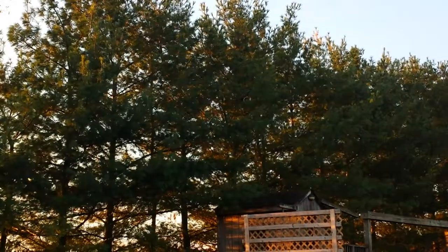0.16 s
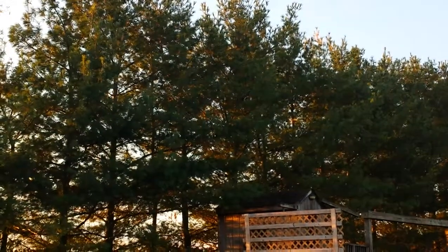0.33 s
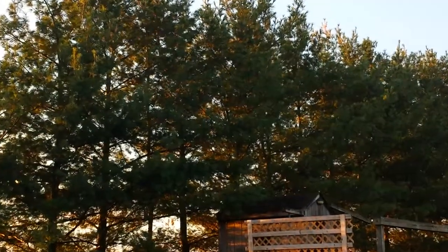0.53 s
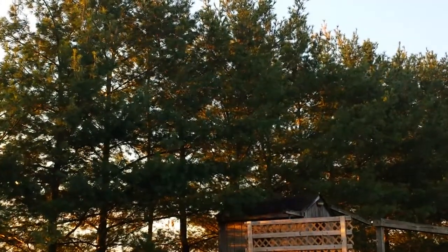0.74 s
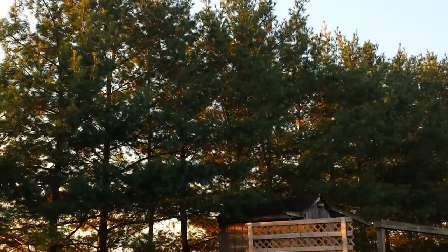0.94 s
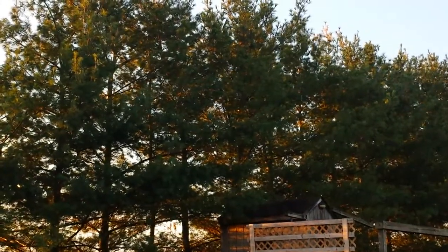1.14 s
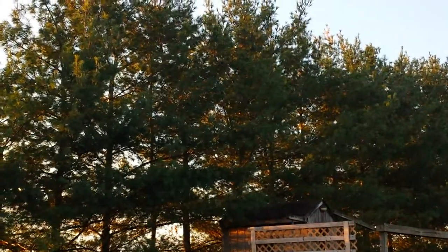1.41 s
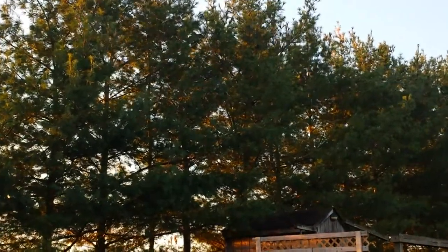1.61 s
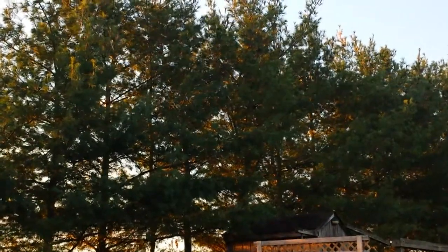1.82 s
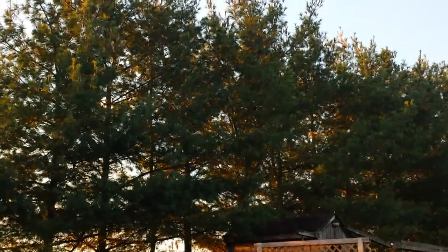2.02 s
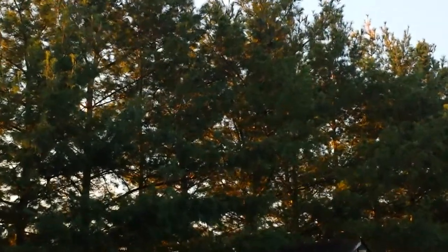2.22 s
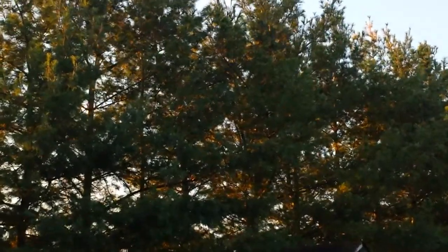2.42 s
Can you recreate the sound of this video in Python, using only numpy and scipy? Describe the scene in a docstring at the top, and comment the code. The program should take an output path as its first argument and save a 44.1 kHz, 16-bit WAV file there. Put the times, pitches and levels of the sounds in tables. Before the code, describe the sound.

Gusty wind rumbles and flutters on a microphone, mostly left, with four plastic clicks and sighing pines

```python
"""A stand of tall pines, some way off: wind sighs in the needles, as shaped noise, over faint wavering sines.
A small camera with two microphone ports hears it. Gusts tumble across the ports as soft thumps, mostly on
the left: short pressure swings of falling pitch. The plastic body ticks four times near the right port,
each a snap and rebound ringing the shell's resonances. A limiter ducks everything around the loudest peaks."""
import sys
import numpy as np
from scipy import signal
from scipy.fft import rfft, irfft
from scipy.io import wavfile
from scipy.ndimage import uniform_filter1d, minimum_filter1d

SR = 44100
rng = np.random.default_rng(int(sys.argv[2]) if len(sys.argv) > 2 else 0)


def log_audio(samples):
    """Write samples as a 16-bit WAV file to the path given in sys.argv[1]."""
    # one column per channel
    frames = np.atleast_2d(samples).T
    # limit to full scale, then quantise
    limited = np.clip(frames, -1, 1)
    pcm = np.round(limited * 32767).astype(np.int16)
    wavfile.write(sys.argv[1], SR, pcm)


N = 112896
TIME = np.arange(N) / SR
HZ = np.fft.rfftfreq(N, 1 / SR)

# Mean spectrum of the needles' sough and the microphone hiss at the two ports:
# f/Hz, left density level/dB per Hz, right density level/dB per Hz, shared power fraction/1
SOUGH_SPECTRUM = [(40, -59, -57, 0.34), (85, -58, -57, 0.2), (170, -67, -66.5, 0.85),
                  (260, -69.5, -68.5, 0.93), (325, -64.5, -65, 0.94), (482, -70, -69.5, 0.97),
                  (690, -61.5, -65, 0.87), (770, -61, -59.5, 0.75), (1017, -66, -65.0, 0.7),
                  (1340, -67.0, -66.0, 0.81), (1800, -71.5, -69.5, 0.79), (2080, -75, -75, 0.61),
                  (2646, -82.5, -87.5, 0.19), (3460, -88.5, -89.5, 0.0), (4260, -88.5, -90.5, 0.0),
                  (5420, -86.5, -88.5, 0.08), (6400, -79.5, -89.5, 0.14), (6940, -84, -89, 0.0),
                  (8170, -93.5, -91.5, 0.0), (10500, -98, -96, 0.0), (12600, -99.3, -99.7, 0.25),
                  (15200, -100.1, -99.7, 0.5)]
# Slow swell of the sough: t/s, level/dB
SOUGH_SWELL = [(0, 0), (.3, -0.5), (.6, 0), (.9, 0), (1.2, 0), (1.5, -0.5), (1.8, 0), (2.1, -0.5),
               (2.56, 0)]
SOUGH_RIGHT_DELAY_S, NOISE_TOP_CUT_HZ = 0.00041, 15450
FLICKER_DB, FLICKER_PER_S = 0.81, 14
SIGH_DB, SIGH_PER_S, SIGH_TOP_HZ = 1.01, 6.13, 2500  # bands above this only flicker

# Faint distant tones: mean f/Hz, left rms level/dB, right rms level/dB, pitch waver/Hz
HUM_TONES = [(111.3, -43, -43, 2.7), (648, -52, -54.5, 7.8), (819, -56, -52, 7)]
HUM_WAVER_DB, HUM_WAVER_PER_S, HUM_PITCH_PER_S = 3.5, 11, 8

# Large eddies striking a port:
# t/s, envelope peak level/dB, f at the peak/Hz, width at half height/ms, port (0 left, 1 right)
LARGE_EDDIES = [(0.04, -20.5, 143, 10.2, 1), (0.404, -20.5, 103, 35, 1), (0.425, -14.5, 134, 7.3, 1),
                (0.827, -18.5, 117, 13, 0), (1.223, -13.5, 127, 6.8, 0), (1.262, -8, 126, 9.6, 0),
                (1.276, -7, 130, 5.1, 0), (1.296, -10, 137, 4.4, 0), (1.432, -9, 177, 6.8, 0),
                (1.454, -7, 146, 8.3, 0), (1.482, -10, 148, 20, 0), (1.499, -23, 87, 31, 0),
                (1.513, -3, 136, 5.4, 0), (1.532, -4, 192, 3.3, 0), (1.547, -19, 131, 14, 0),
                (1.575, -15, 123, 9.5, 1), (1.612, -19.1, 135, 20, 0), (1.64, -12.5, 157, 8.1, 0),
                (1.663, -26, 94, 7.1, 0), (1.663, -23, 112, 20, 1), (1.679, -8.5, 129, 8.8, 0),
                (1.693, -12, 109, 7.7, 0), (1.709, -16, 98, 12, 0), (1.731, -13, 129, 18, 0),
                (1.749, -13, 172, 7.6, 0), (1.787, -10, 147, 11.5, 0), (1.823, -12.1, 105, 13, 0),
                (1.867, -5.5, 160, 5, 0), (1.917, -15, 138, 10, 0), (2.104, -22, 113, 28, 0),
                (2.229, -6, 168, 5.4, 0), (2.246, -18, 119, 11.3, 0), (2.268, -14, 206, 10.1, 0),
                (2.287, -22.2, 141, 9.2, 1), (2.3, -21, 152, 29, 0), (2.32, -10, 193, 6.1, 1),
                (2.337, -18.1, 177, 11, 1), (2.338, -17, 129, 8.5, 0), (2.352, -15.5, 109, 6.7, 0),
                (2.368, -15.5, 206, 11.5, 0), (2.38, -21, 163, 9.7, 1), (2.397, -20.5, 134, 12, 1),
                (2.414, -12.5, 145, 7, 0), (2.429, -9.5, 228, 7.3, 0), (2.443, -12, 129, 10.4, 0),
                (2.443, -26, 104, 10, 1), (2.457, -16.4, 147, 5, 0)]
# Median envelope peak of the small eddies: t/s, left level/dB, right level/dB
GUST_LEVELS = [(0, -52, -48), (.2, -53, -47), (.45, -50, -47), (.7, -38, -52), (.9, -42, -53),
               (1.15, -44, -52), (1.2, -27, -52), (1.33, -46, -52), (1.41, -50, -52), (1.44, -22, -51),
               (1.55, -25, -40), (1.59, -38, -41), (1.7, -24.5, -48), (1.88, -25, -40), (1.97, -37, -51),
               (2.21, -35, -45), (2.26, -26, -34), (2.33, -25.5, -32), (2.45, -27, -34), (2.5, -45, -46),
               (2.56, -48, -47)]
EDDIES_PER_S, EDDY_SCATTER_DB = 90, 5  # small eddies at each port
EDDY_HZ, EDDY_SPREAD_OCT, EDDY_CYCLES = 134.4, 0.72, 1.36
EDDY_ATTACK_SHARE = 0.6  # below 1, the front is steeper than the tail
EDDY_GLIDE, EDDY_GLIDE_SPREAD = 0.83, 0.57  # pitch decay rate per eddy length
EDDY_GLIDE_PER_DB, EDDY_USUAL_DB = 0.09, -16  # stronger eddies fall further in pitch

# Ticks of the body:
# t/s, right peak level/dB before the limiter, rebound delay/ms, rebound level/dB relative to the snap,
# lower corner f/Hz, upper corner f/Hz
BODY_TICKS = [(.2590, 5, 0.2, -6.5, 2720, 15000), (0.7372, -8.5, 0.37, -3, 1860, 8500),
              (1.4015, 4, 0.196, -8.5, 2800, 15000), (2.0488, -10, 0.376, -7, 1360, 5600)]
# Modes of the plastic shell: f/Hz, bandwidth/Hz, level/dB relative to the bare snap
SHELL_MODES = [(1950, 390, 3), (2930, 780, -1), (6040, 1060, 7), (9400, 1400, -10), (14500, 1700, -9)]
# Modes of the narrow left inlet: f/Hz, bandwidth/Hz, level/dB relative to the right port
INLET_MODES = [(6500, 600, -7), (7400, 1100, -1), (10200, 730, -20)]
SNAP_TOP_HZ = 15400
LEFT_LEAK_DB, LEFT_DELAY_S = -28, 0.0001

LOW_CUT_HZ, TOP_HZ = 50.4, 16600
LIMIT_DB, LOOKAHEAD_S, SLEW_S = -2.2, 0.0064, 0.02


def undb(db):
    """Level definition: an amplitude ratio is ten to the power of its level over 20."""
    return 10 ** (np.asarray(db) / 20)


def walk(rate):
    """Smoothed random process: values held for 1 / rate s, averaged twice; spread near 1."""
    hold = int(SR / rate)
    steps = np.repeat(rng.standard_normal(N // hold + 1), hold)
    smooth = uniform_filter1d(uniform_filter1d(steps, hold), hold)
    return 1.343 * smooth[:N]


def ring(hz, width_hz):
    """Damped harmonic resonance: a band-pass response with gain 1 at its centre."""
    return 1j * HZ * width_hz / (hz ** 2 - HZ ** 2 + 1j * HZ * width_hz)


def late(s):
    """Propagation delay: phase lag proportional to frequency."""
    return np.exp(-2j * np.pi * HZ * s)


def pines():
    """Partial coherence: noise partly common to the ports, in bands that sigh together and flicker alone."""
    table = np.array(SOUGH_SPECTRUM).T
    octave = np.log2(HZ + 1)
    left_db, right_db, like = (np.interp(octave, np.log2(table[0]), col) for col in table[1:])
    like = np.clip(like, 0, 1)
    shared, own_left, own_right = rfft(rng.standard_normal((3, N)))
    left = np.sqrt(like) * shared + np.sqrt(1 - like) * own_left
    right = np.sqrt(like) * shared * late(SOUGH_RIGHT_DELAY_S) + np.sqrt(1 - like) * own_right
    both = np.array([undb(left_db) * left, undb(right_db) * right])
    both = both * np.sqrt(SR / 2) * (HZ < NOISE_TOP_CUT_HZ)  # white noise scaled to unit power per Hz
    swell_db = np.interp(TIME, *np.array(SOUGH_SWELL).T)
    sigh_db = SIGH_DB * walk(SIGH_PER_S)
    out = 0
    for centre in np.arange(4, 14.6, .5):  # half-octave spacing, in octaves above 1 Hz
        share = np.clip(1 - 2 * abs(octave - centre), 0, 1)
        band_db = swell_db + FLICKER_DB * walk(FLICKER_PER_S)
        if 2 ** centre < SIGH_TOP_HZ:
            band_db = band_db + sigh_db
        out = out + irfft(both * share, N) * undb(band_db)
    return out


def hum():
    """Frequency and amplitude modulation: sines that waver in pitch and level."""
    out = 0
    for hz, left_db, right_db, waver_hz in HUM_TONES:
        cycles = np.cumsum(hz + waver_hz * walk(HUM_PITCH_PER_S)) / SR
        tone = undb(HUM_WAVER_DB * walk(HUM_WAVER_PER_S)) * np.sin(2 * np.pi * cycles)
        out = out + np.sqrt(2) * undb([[left_db], [right_db]]) * tone  # sqrt(2): rms to peak
    return out


def add_eddy(out, at_s, peak_db, hz, length_s, turn, bend):
    """Passing vortex: a brief pressure swing, steeper and higher in front, slower and lower behind."""
    reach = int(2.5 * length_s * SR)
    i = int(at_s * SR) + np.arange(-reach, reach)
    i = i[(i >= 0) & (i < N)]
    t = (i / SR - at_s) / length_s  # time in eddy lengths
    side = np.where(t < 0, EDDY_ATTACK_SHARE, 2 - EDDY_ATTACK_SHARE)
    bell = np.exp(-np.log(16) * (t / side) ** 2)
    glide = EDDY_GLIDE + EDDY_GLIDE_SPREAD * bend + EDDY_GLIDE_PER_DB * (peak_db - EDDY_USUAL_DB)
    glide = max(glide, .01)
    # integral of a pitch that decays exponentially
    cycles = hz * length_s * (1 - np.exp(-glide * np.maximum(t, -1))) / glide
    out[i] += undb(peak_db) * bell * np.cos(2 * np.pi * (cycles + turn))


def buffeting():
    """Turbulent pressure: listed large eddies and random small ones following the gusts, each port alone."""
    out = np.zeros((2, N))
    gust = np.array(GUST_LEVELS).T
    count = int(EDDIES_PER_S * N / SR)
    for port in range(2):
        places = rng.random((count, 2))
        shapes = rng.standard_normal((count, 3))
        for (when, turn), (pitch, size, bend) in zip(places, shapes):
            at_s = when * N / SR
            hz = EDDY_HZ * 2 ** (EDDY_SPREAD_OCT * pitch)
            db = np.interp(at_s, gust[0], gust[1 + port]) + EDDY_SCATTER_DB * size
            add_eddy(out[port], at_s, db, hz, EDDY_CYCLES / hz, turn, bend)
    shapes = rng.standard_normal((len(LARGE_EDDIES), 2))
    for (at_s, db, hz, ms, port), (turn, bend) in zip(LARGE_EDDIES, shapes):
        add_eddy(out[int(round(port))], at_s, db, hz, ms / 1000, turn, bend)
    return out


def ticks():
    """Impulse excitation of modes: snap and rebound ring the shell, reaching the left by a narrow inlet."""
    shell = 1 + sum(undb(db) * ring(hz, width) for hz, width, db in SHELL_MODES)
    right = 0
    for at_s, db, rebound_ms, rebound_db, low_hz, high_hz in BODY_TICKS:
        high_pass = signal.butter(8, low_hz, "high", fs=SR, output="sos")
        _, above = signal.sosfreqz(high_pass, HZ, fs=SR)
        snap = above / (1 + 1j * HZ / high_hz) ** 2
        snap = snap * (1 + undb(rebound_db) * late(rebound_ms / 1000)) * shell
        snap = snap / (1 + (HZ / SNAP_TOP_HZ) ** 20)
        peak = abs(irfft(snap, N)).max()
        right = right + snap * late(at_s) * undb(db) / peak
    inlet = undb(LEFT_LEAK_DB)
    for k, (hz, width, db) in enumerate(INLET_MODES):
        inlet = inlet + (-1) ** k * undb(db) * ring(hz, width)  # modes alternate in sign
    left = right * inlet * late(LEFT_DELAY_S)
    return irfft(np.array([left, right]), N)


def scene():
    """Superposition: the pressures of all sources add at each port."""
    return pines() + hum() + buffeting() + ticks()


def record(dry):
    """Band limiting and gain control: low and top cut, look-ahead limiter on both ports, top cut again."""
    low_cut = signal.butter(2, LOW_CUT_HZ, "high", fs=SR, output="sos")
    top_cut = signal.ellip(8, .1, 50, TOP_HZ, fs=SR, output="sos")
    x = signal.sosfilt(top_cut, signal.sosfilt(low_cut, dry))
    need = np.minimum(1, undb(LIMIT_DB) / (abs(x).max(axis=0) + 1e-9))
    slew = int(SLEW_S * SR)
    held = minimum_filter1d(need, slew + int(LOOKAHEAD_S * SR))
    gain = uniform_filter1d(held, slew)
    return signal.sosfilt(top_cut, x * gain)


dry = scene()
out = record(dry)
log_audio(out)
```